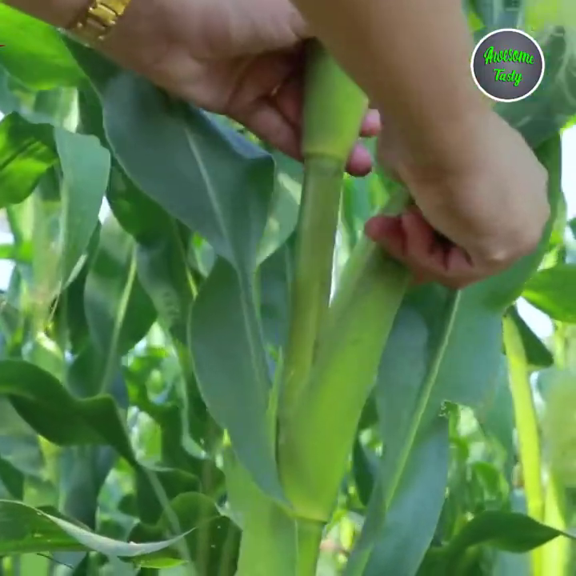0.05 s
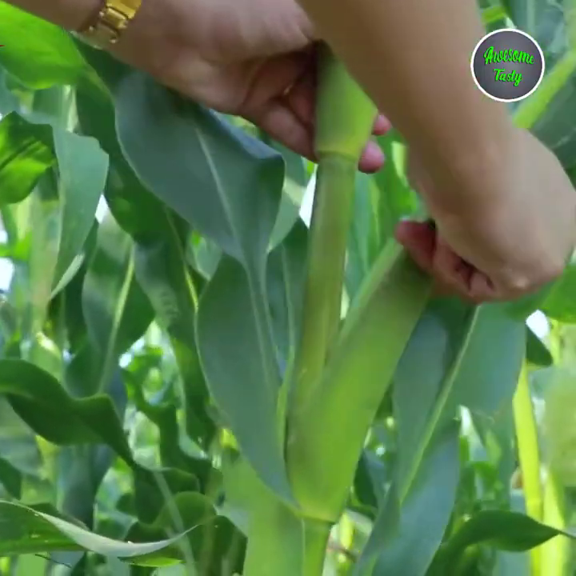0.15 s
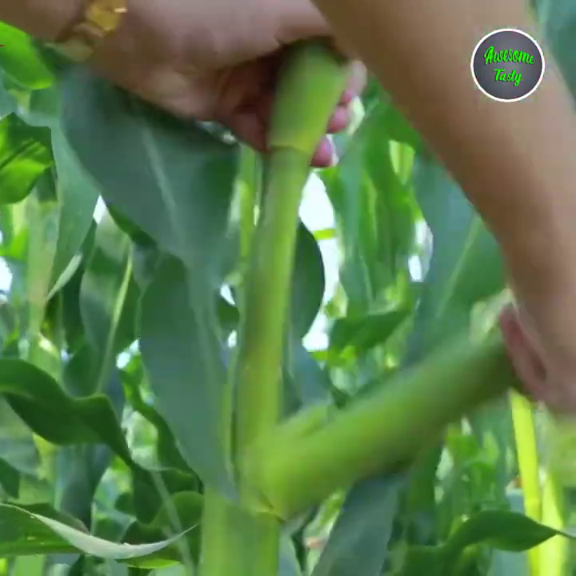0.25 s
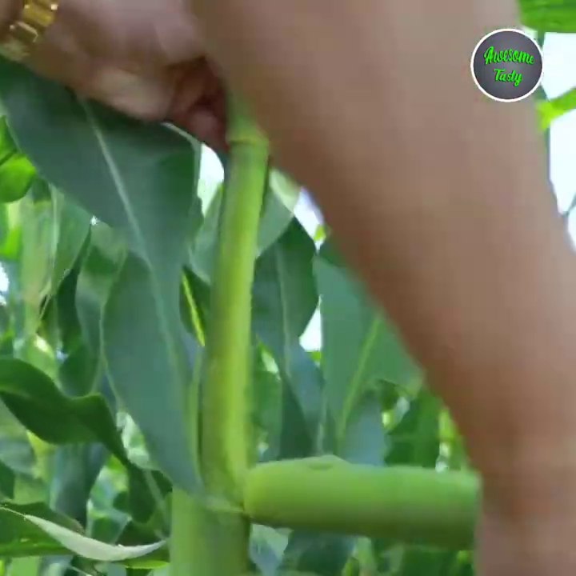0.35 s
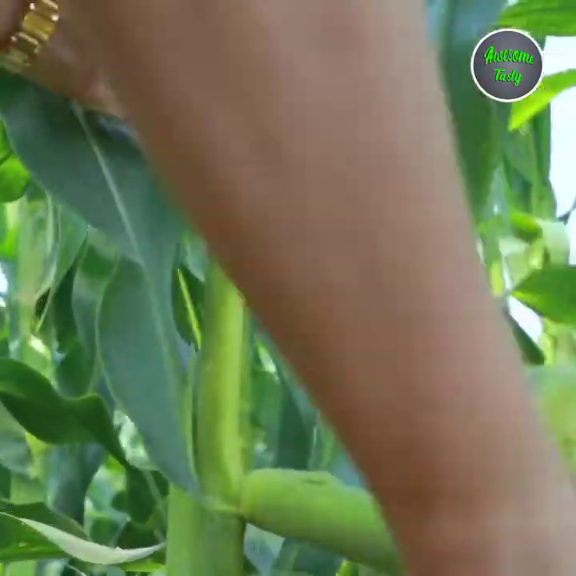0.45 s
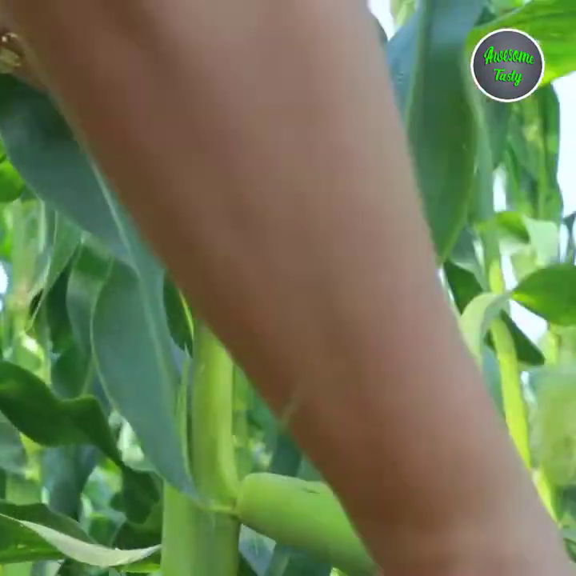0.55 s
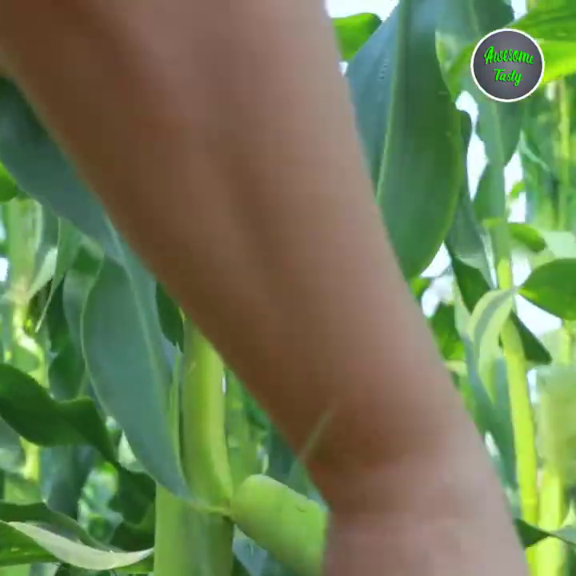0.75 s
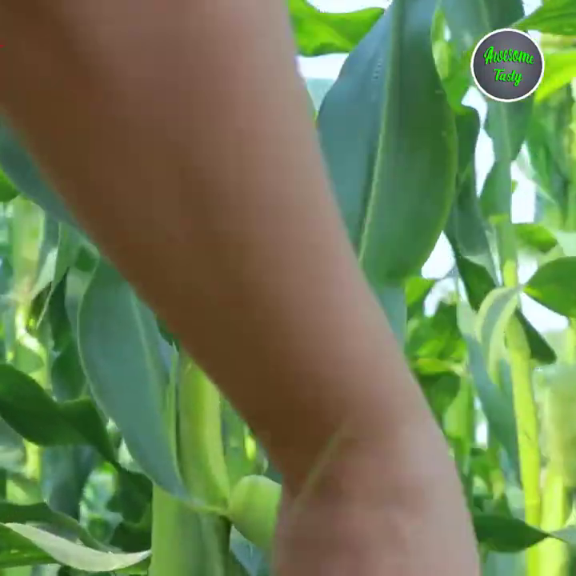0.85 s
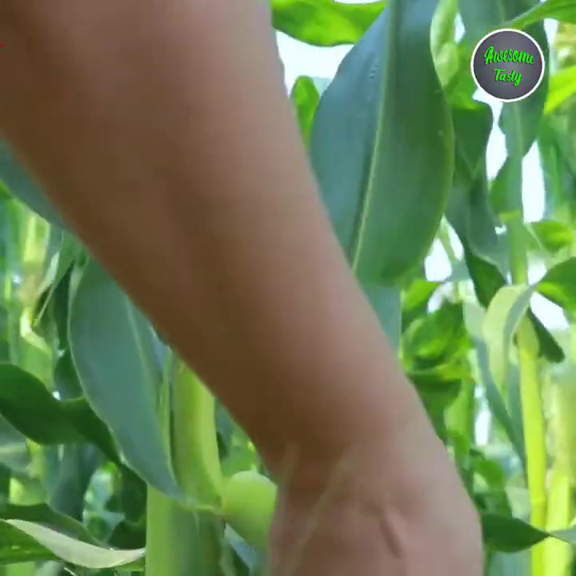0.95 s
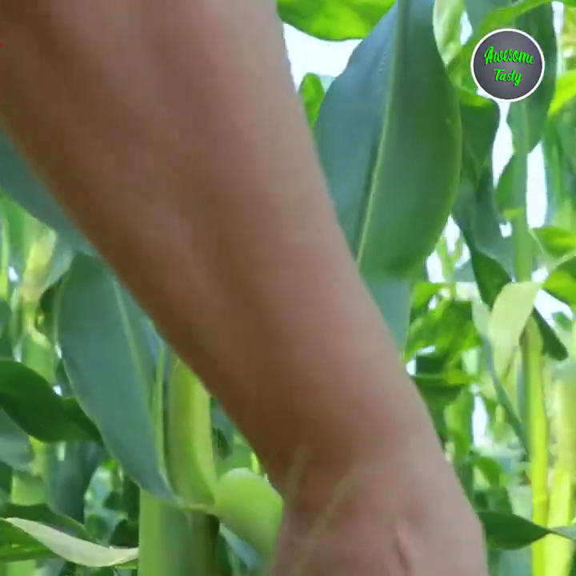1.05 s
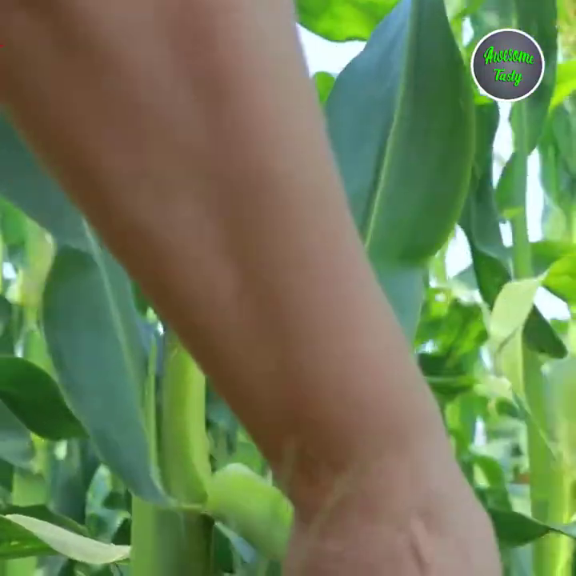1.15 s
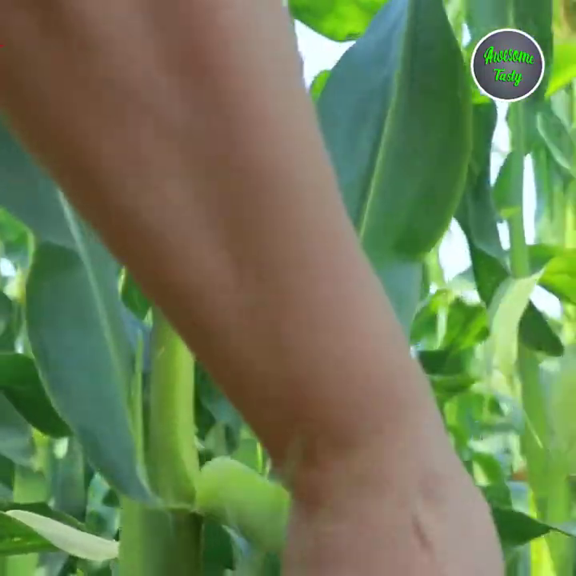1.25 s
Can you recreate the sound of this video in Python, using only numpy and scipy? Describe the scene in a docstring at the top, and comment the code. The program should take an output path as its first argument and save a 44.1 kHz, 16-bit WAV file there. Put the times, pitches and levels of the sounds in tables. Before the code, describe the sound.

An ear of corn snaps off its stalk in a quick volley of juicy cracks, very close to the microphone. Leaves and husk then rustle and squeak softly, ending with one light knock. A distant engine throbs faintly across the field.

```python
"""An ear of corn is snapped off its stalk close to the microphone. At first leaves stir faintly, and far
off something throbs evenly, probably a slow pump engine, which runs on throughout. At 0.22 s the bent
ear gives way: fibre bundles break in a quick volley of juicy cracks, with a deep pop, overloading the
microphone. Leaves and husk then rustle, squeak and tick against the arm, with a few soft bumps.
Near the end, at 1.26 s, the ear knocks once."""
import sys
import numpy as np
from scipy import signal
from scipy.fft import rfft, irfft
from scipy.io import wavfile
from scipy.ndimage import uniform_filter1d

SR = 44100
rng = np.random.default_rng(int(sys.argv[2]) if len(sys.argv) > 2 else 0)


def log_audio(samples):
    """Write samples as a 16-bit WAV file to the path given in sys.argv[1]."""
    # one column per channel
    frames = np.atleast_2d(samples).T
    # limit to full scale, then quantise
    limited = np.clip(frames, -1, 1)
    pcm = np.round(limited * 32767).astype(np.int16)
    wavfile.write(sys.argv[1], SR, pcm)


N = 57330


def amp(db):
    """Decibels to gain."""
    return 10 ** (np.asarray(db) / 20)


def unit_rms(x):
    """Scales to rms 1."""
    return x / np.sqrt(np.mean(x ** 2) + 1e-20)


def add(mix, start_s, sound):
    """Drops a sound into the mix, trimming any overhang."""
    start = round(start_s * SR)
    part = mix[max(start, 0):][:len(sound) + min(start, 0)]
    part += sound[max(-start, 0):][:len(part)]


def eq_grid():
    """The frequencies in Hz on which EQ curves are drawn."""
    return np.maximum(np.fft.rfftfreq(4096, 1 / SR), 1)


def eq_curve(points):
    """Joins (frequency [Hz], level [dB]) points into an EQ curve."""
    hz, db = np.transpose(points)
    return np.interp(np.log(eq_grid()), np.log(hz), db)


def colour(x, curve_db):
    """Minimum-phase EQ of unit energy: shapes the tone with no pre-ring."""
    cepstrum = irfft(np.log(amp(curve_db) + 1e-5))
    half = len(cepstrum) // 2
    cepstrum[1:half] *= 2
    cepstrum[half + 1:] = 0
    taps = irfft(np.exp(rfft(cepstrum)))
    return signal.fftconvolve(x, taps / np.linalg.norm(taps))[:N]


def grains(per_s, spread_db):
    """A crackle of random clicks of uneven size, rms 1."""
    size = amp(spread_db * np.minimum(rng.exponential(1, N), 4))
    polarity = rng.choice([-1, 1], N)
    fires = rng.random(N) < per_s / SR
    return unit_rms(size * polarity * fires)


def add_blip(mix, centre_s, db, hz, length_s):
    """Drops in a few cycles of tone, faded in and out around a moment."""
    t = np.arange(-length_s / 2, length_s / 2, 1 / SR)
    fade = np.cos(np.pi * t / length_s) ** 2
    add(mix, centre_s - length_s / 2, amp(db) * fade * np.cos(2 * np.pi * hz * t))


# The volley, one hit per fibre bundle (time [s], relative level [dB], tear length [s], tilt [dB/octave])
CRACK_HITS = [(0.2233, -11, .001, 5), (0.2277, -16, 0.00063, 3), (0.2321, 1.5, 0.00039, 0),
              (.2350, 3.5, 0.0026, .5), (.2378, 2.5, 0.0014, -0.5), (0.241, 0.5, 0.0029, 1),
              (0.2524, 7, 0.0027, -1), (.2564, 1, 0.0011, 1.5), (0.2588, -0.5, 0.0012, 1),
              (0.2628, 5, 0.006, -1.5), (0.273, 2, 0.0018, -2.5), (0.2765, 5, 0.00091, 2),
              (0.2796, -2.5, 0.00096, -0.5), (0.2827, -3, 0.0023, 2.5), (0.2877, 4, 0.0016, 5),
              (0.2901, 2, .001, 1), (0.2949, 5, 0.0038, 0), (0.3003, -2.5, 0.00095, 1),
              (0.3115, 1.5, 0.0005, 2), (0.3142, -4, 0.00073, 0.5), (0.3178, -12.5, 0.00058, -5.5),
              (0.321, -6, 0.00074, -1.5), (0.3286, -2, 0.00035, -1), (0.3316, -6.5, 0.00054, 2),
              (.3480, -18.5, .003, 0)]
# Juicy bite of breaking fibre (frequency [Hz], level [dB])
CRACK_EQ = [(40, -20), (150, -23.5), (400, -7.5), (800, -11.5), (1500, -6.5), (2000, -3), (2600, 2),
            (3100, -3), (3700, 0), (5000, -6), (8000, -8.5), (11000, -16), (14000, -16.5), (16000, -17)]
# Ring of the ear and stalk (frequency [Hz], relative level [dB], 60 dB decay time [s])
STALK_MODES = [(385, -39, .15), (463, -35, .22), (570, -40, .16), (1052, -34, .15), (1945, -30, .07),
               (2235, -26, .07), (2385, -27, .06), (2569, -26, .06), (2736, -26, .06), (3660, -27, .045),
               (5515, -33, .05), (8160, -33, .05)]
def snap():
    """Each bundle breaks with a click and a run of tearing fibres; the ear and stalk ring."""
    cracks, t = np.zeros(N), np.arange(SR // 4) / SR
    trim_db, ring_gain = -4.5, 0.084
    for time_s, db, length_s, tilt in CRACK_HITS:
        gate = np.exp(-(t / length_s) ** 6)
        tear = grains(per_s=12000, spread_db=3)[:len(t)] * gate
        tear *= np.sqrt(length_s * SR) / (np.linalg.norm(tear) + 1e-9)  # longer tears carry more energy
        tear[0] = 2.6  # the first fibre's click
        tone_db = eq_curve(CRACK_EQ) + tilt * np.log2(eq_grid() / 2500)
        add(cracks, time_s, amp(trim_db + db) * colour(tear, tone_db))
    ring = sum(amp(db - 60 * t / t60) * np.cos(2 * np.pi * hz * t) for hz, db, t60 in STALK_MODES)
    return cracks + ring_gain * signal.fftconvolve(cracks, ring)[:N]


# Swell of fine crackle between the cracks (time [s], level [dB])
TEARING_ENVELOPE = [(.218, -63), (0.223, -51), (0.233, -19), (.245, -13.5), (.28, -12.5), (.305, -33),
                    (.325, -41), (0.346, -49), (.36, -60)]
def tearing():
    """Fine fibres keep parting for as long as the ear bends."""
    times, db = np.transpose(TEARING_ENVELOPE)
    swell = amp(np.interp(np.arange(N) / SR, times, db, left=-100, right=-100))
    return colour(grains(per_s=3000, spread_db=4.5) * swell, eq_curve(CRACK_EQ))


# Fader moves for the sliding leaves (time [s], body level [dB], treble level [dB])
RUSTLE_ENVELOPE = [(0, -35.5, -40.5), (.1, -37.5, -48), (.15, -35, -51), (.215, -38, -41),
                   (0.298, -20, -17), (0.368, -33.5, -40), (.41, -26.5, -34.5), (.435, -29, -33.5),
                   (0.449, -26, -27.5), (0.478, -35, -44.5), (.52, -33.5, -48), (.585, -38.5, -48.5),
                   (.65, -32.5, -40.5), (.72, -40.5, -48.5), (0.747, -33.5, -42), (.84, -41.5, -53),
                   (.94, -41, -53.5), (1.05, -38, -47.5), (1.09, -39, -50), (1.125, -38.5, -50),
                   (1.2, -40.5, -52), (1.24, -36.5, -46.5), (1.3, -37, -57)]
# Papery body of the rustle (frequency [Hz], level [dB])
BODY_EQ = [(100, -17.5), (250, -3), (450, 2), (750, 0.5), (1200, 1.5), (2200, 1), (3200, -5.5), (4600, -5),
           (6500, -16), (16000, -32)]
# Crisp top of the rustle (frequency [Hz], level [dB])
TREBLE_EQ = [(1000, -12), (3500, 1), (5500, 3), (8500, -1), (11000, -5.5), (14000, -4.5), (16000, -13)]
SLIPS_PER_S, SLIP_SPREAD_DB = 9000, 1.5
def leaf_rustle():
    """Dense tiny slips of leaf on leaf, in two layers that flutter together."""
    times, body_db, treble_db = np.transpose(RUSTLE_ENVELOPE)
    out, t = np.zeros(N), np.arange(N) / SR
    depth_db, smoothing_s = 1.46, 0.0071
    flutter_db = depth_db * unit_rms(uniform_filter1d(rng.standard_normal(N), round(smoothing_s * SR)))
    for db, eq in [(body_db, BODY_EQ), (treble_db, TREBLE_EQ)]:
        fader = amp(np.interp(t, times, db) + flutter_db)
        out += colour(grains(SLIPS_PER_S, SLIP_SPREAD_DB) * fader, eq_curve(eq))
    return out


# Leaf ticks and swishes (time [s], level [dB], length [s], band centre [Hz], half-width [octaves])
SCUFF_HITS = [(0.1962, -25, 0.0013, 6900, 1.5), (0.406, -28, 0.0064, 2060, 0.29),
              (0.665, -43, 0.04, 10400, 0.2), (1.04, -43.5, 0.032, 4500, 0.42),
              (1.105, -44, 0.045, 1600, .25), (1.179, -33.5, 0.00276, 7950, 1.2),
              (1.213, -42, 0.0059, 11000, 0.46), (1.236, -42, 0.0056, 5000, .6),
              (1.257, -29, 0.0017, 1300, 0.47)]
def leaf_scuffs():
    """Leaf edges catch in short runs of slips, each in its own band."""
    out = np.zeros(N)
    for time_s, db, length_s, hz, octaves in SCUFF_HITS:
        slips = unit_rms(grains(SLIPS_PER_S, SLIP_SPREAD_DB)[:round(length_s * SR)])
        band_db = -20 * np.log10(1 + (np.log2(eq_grid() / hz) / octaves) ** 2)
        add(out, time_s, amp(db) * colour(slips, band_db))
    return out


# Tiny squeaks (time [s], peak level [dB], pitch [Hz], length [s])
SQUEAK_HITS = [(0.406, -20, 2060, 0.0098), (0.4477, -19.5, 1540, 0.0089), (1.1808, -29.5, 4540, 0.0046)]
def husk_squeaks():
    """The husk squeaks briefly as it rubs."""
    out = np.zeros(N)
    for squeak in SQUEAK_HITS:
        add_blip(out, *squeak)
    return out


# The stalk's pop, then the knocks (time [s], peak level [dB], pitch [Hz], length [s])
POP_AND_KNOCK_HITS = [(0.266, -17, 237, 0.011), (0.363, -21, 224, 0.0054), (.409, -23.5, 400, 0.011),
                      (.530, -26.5, 553, 0.0057), (0.655, -29, 386, 0.014), (1.2591, -18, 598, 0.0058)]
def pop_and_knocks():
    """A deep pop as the stalk gives way, then soft, dull knocks with no ring."""
    out = np.zeros(N)
    for hit in POP_AND_KNOCK_HITS:
        add_blip(out, *hit)
    return out


def plant_echoes(direct):
    """The surrounding plants scatter back sparse, quickly dying echoes."""
    t = np.arange(SR // 2) / SR
    send_db, t60, predelay_s = -19, 0.19, 0.005
    tail = amp(-60 * t / t60) * (t > predelay_s)
    taps = grains(per_s=3000, spread_db=0.67)[:len(t)] * tail
    return amp(send_db) * signal.fftconvolve(direct, taps / np.linalg.norm(taps))[:N]


# The engine's double beat (time in cycle [s], peak level [dB], pitch [Hz], length [s])
ENGINE_BEATS = [(.009, -31, 83, 0.04), (0.049, -29.5, 141, 0.029)]
CYCLE_S = 0.161
def distant_engine():
    """A far engine throbs evenly, two low thumps to a cycle."""
    out = np.zeros(N)
    for cycle_start in np.arange(0, N / SR, CYCLE_S):
        for offset_s, db, hz, length_s in ENGINE_BEATS:
            add_blip(out, cycle_start + offset_s, db, hz, length_s)
    return out


# Dark outdoor bed (frequency [Hz], level [dB])
RUMBLE_EQ = [(20, -14), (40, -21), (65, -4), (120, 1), (200, -4.5), (270, 0), (350, -9.5), (700, -16.5),
             (2000, -30), (16000, -61)]
RUMBLE_DB = -39
def outdoor_rumble():
    """Steady low noise of the open air."""
    return amp(RUMBLE_DB) * unit_rms(colour(rng.standard_normal(N), eq_curve(RUMBLE_EQ)))


def scene():
    """The mono mix: only the snap and tearing feed the echoes."""
    breaking = snap() + tearing()
    echoes = plant_echoes(breaking)
    foliage = leaf_rustle() + leaf_scuffs() + husk_squeaks()
    background = distant_engine() + outdoor_rumble()
    return (breaking + echoes + foliage + pop_and_knocks() + background)[None]


CLIP_LEVEL, HIGH_CUT_HZ = 0.82, 15950
def record(dry):
    """The snap clips the input; a steep high cut takes off the very top."""
    clipped = np.clip(dry, -CLIP_LEVEL, CLIP_LEVEL)
    high_cut = signal.firwin(401, HIGH_CUT_HZ, window=("kaiser", 8), fs=SR)
    return signal.oaconvolve(clipped, high_cut[None], "same")


dry = scene()
out = record(dry)
log_audio(out)
```